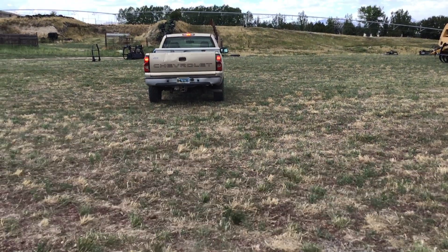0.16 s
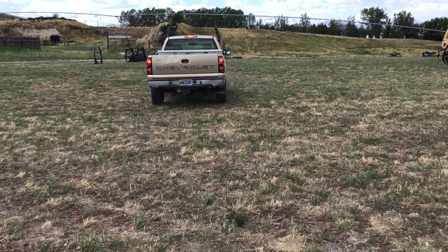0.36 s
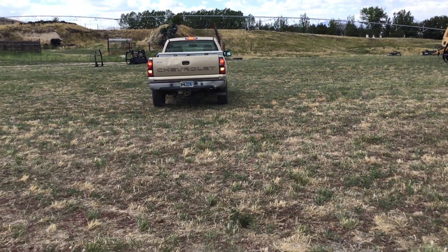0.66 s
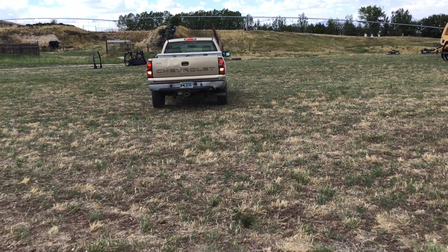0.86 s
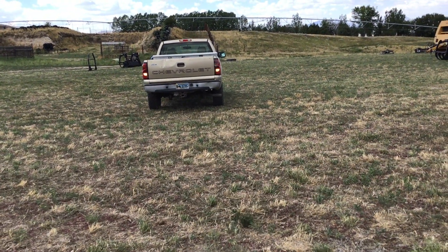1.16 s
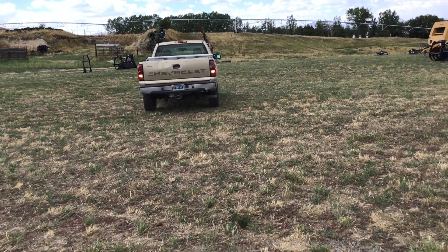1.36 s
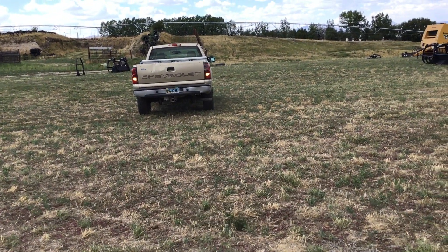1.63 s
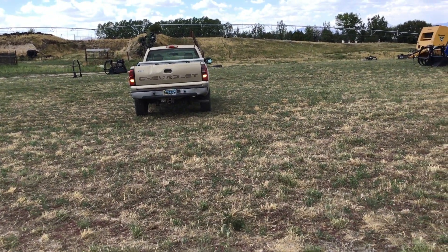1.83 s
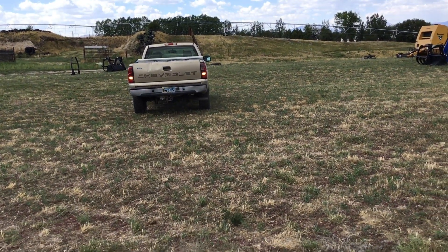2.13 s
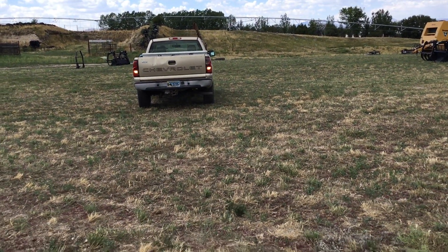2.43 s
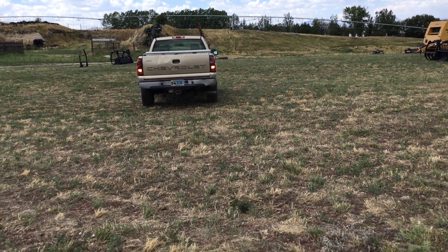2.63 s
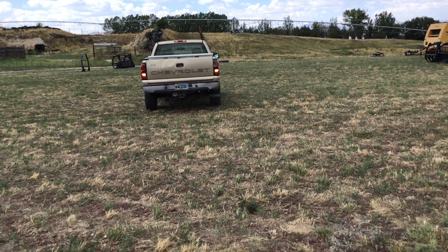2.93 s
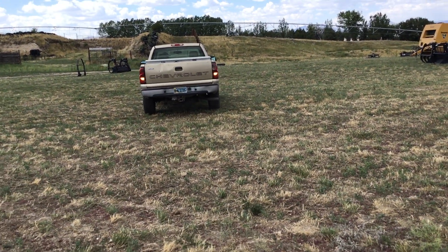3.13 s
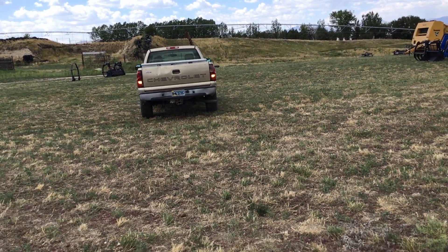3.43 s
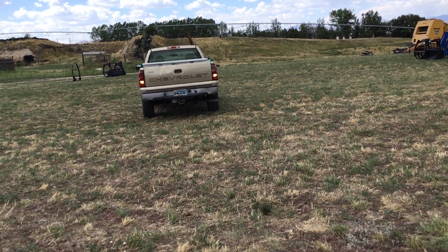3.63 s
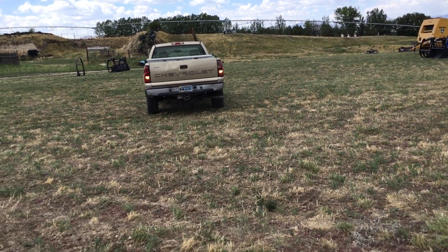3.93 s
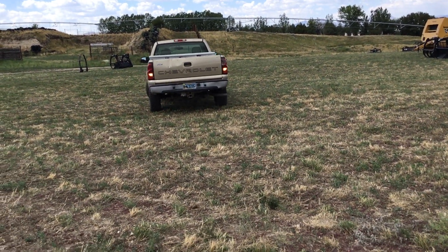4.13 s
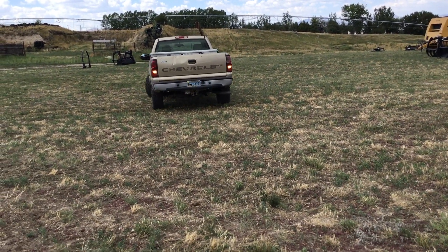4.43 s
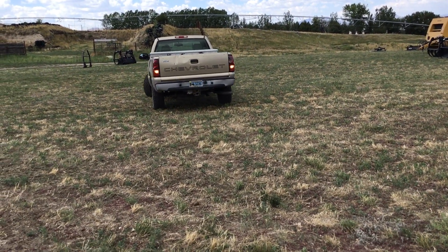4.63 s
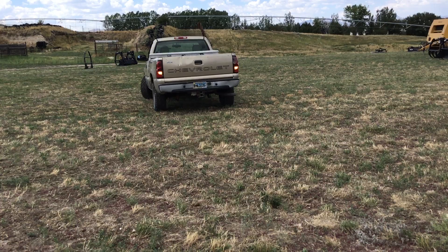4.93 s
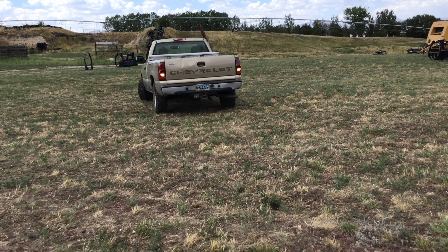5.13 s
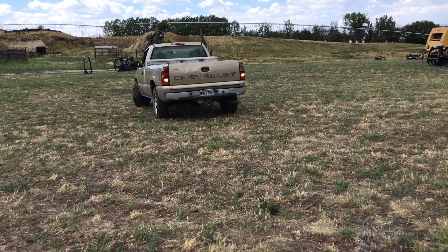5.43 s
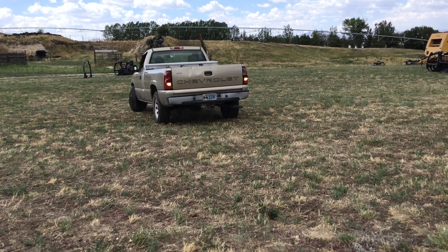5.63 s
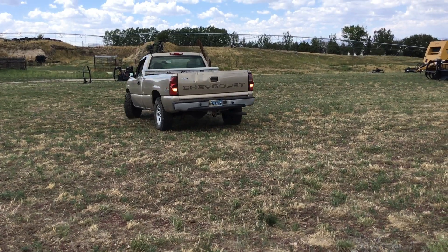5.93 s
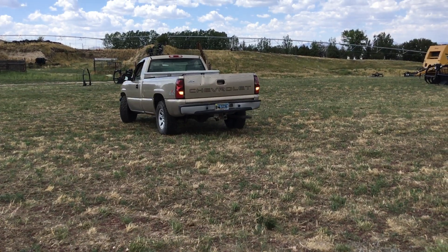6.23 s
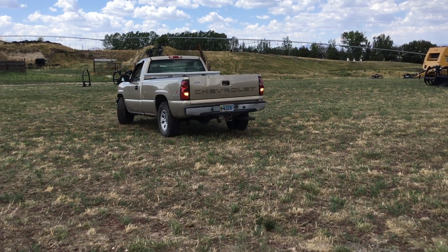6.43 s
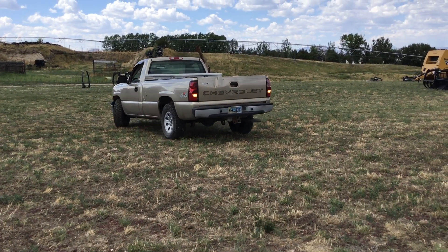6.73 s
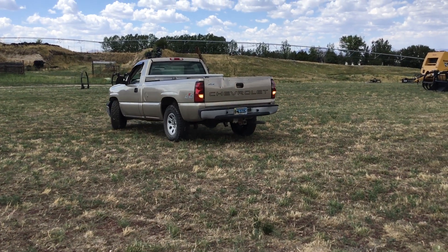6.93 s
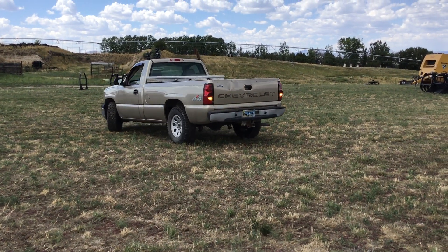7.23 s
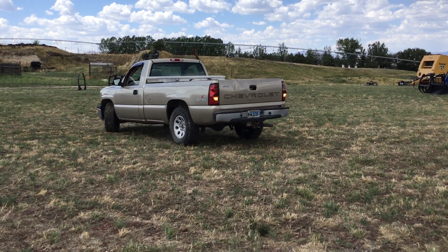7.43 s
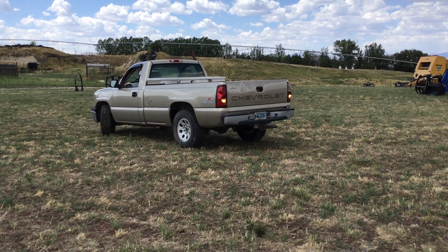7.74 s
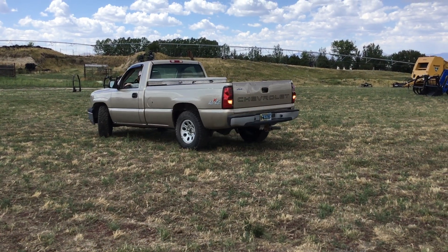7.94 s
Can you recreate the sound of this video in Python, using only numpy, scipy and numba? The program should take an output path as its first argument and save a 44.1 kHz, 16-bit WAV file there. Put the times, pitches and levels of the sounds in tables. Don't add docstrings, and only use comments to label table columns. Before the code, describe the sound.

A hand-held phone in an open field hears a truck reversing slowly toward it. Its throbbing exhaust rises and falls with the throttle over a faint distant engine hum and light breeze rumble. Metallic ticking and whirring strengthen as it nears. Close handling knocks, dull scuffs and grassy rustles interrupt, especially around three and 5.6 seconds; it ends on a rising rev with crackling straw.

```python
import sys
import numpy as np
from scipy import signal
from scipy.fft import rfft, irfft
from scipy.io import wavfile
from scipy.ndimage import uniform_filter1d
from numba import njit

SR = 44100
rng = np.random.default_rng(int(sys.argv[2]) if len(sys.argv) > 2 else 0)


def put_to_file(sound):
    columns = np.atleast_2d(sound).T
    safe = np.clip(columns, -1, 1)
    whole_steps = np.round(safe * 32767)
    wavfile.write(sys.argv[1], SR, whole_steps.astype(np.int16))


def level_to_linear(level):
    exponent = np.asarray(level, float) / 20
    return 10 ** exponent


N = 356019

# time_s, firing_rate_hz
ENGINE_SPEED = [(0.5, 43), (0.94, 47.9), (1.35, 46.8), (1.74, 38.4), (2.07, 47.2), (2.5, 50.6), (3.2, 46.2),
                (3.5, 49), (4.07, 74.3), (4.52, 62.6), (5.03, 68.9), (5.42, 63.6), (6.0, 52.9),
                (6.35, 56.6), (6.8, 63.8), (7.06, 43.6), (7.55, 52.5), (8.07, 72.5)]
# time_s, gain_db
THROTTLE_LOAD = [(0, -2.5), (1.1, -0.5), (2.7, -0.5), (3.2, -11.5), (3.7, -2.5), (4.2, 1.5), (5.5, 2.5),
                 (5.9, -0.5), (6.25, 4.5), (6.85, 2), (7.1, 1), (7.45, -1.5), (7.75, 5), (8.07, 1)]
# firing_rate_hz, order_1_db, order_2_db, order_3_db
EXHAUST_ORDERS = [(39, -86, -70, -55), (43.6, -80.5, -63, -58), (48, -70, -53, -54.5),
                  (49.7, -71.5, -54.5, -57.5), (55.1, -61.5, -51.5, -49), (62.5, -63, -49.5, -57.5),
                  (66, -66.5, -51, -78), (71, -54, -50, -68)]
# time_s, gain_db
CLOSENESS = [(0, -0.5), (.6, 1.5), (1.7, 0), (3.3, 0), (3.93, 6), (4.2, 4), (5.5, 6), (5.9, 8), (6.5, 11),
             (7.1, 7.5), (8.07, 11)]
# time_s, share_0_to_1
FLANK_TURN = [(0, 0.22), (5.4, 0.26), (6.2, 0.9), (8.07, 0.9)]
# pitch_hz, level_db (per Hz)
GROWL_COLOUR = [(60, -33), (90, -5), (140, 7), (190, 6.5), (225, 0), (260, -4.5), (300, 0), (330, -5.5),
                (355, -3.5), (390, -17), (450, -18), (520, -22), (700, -22), (1000, -64)]
# pitch_hz, width_hz, from_behind_db, from_flank_db
CASTINGS = [(1316, 17, 3.5, -5.5), (1510, 34, -17, -1.5), (1830, 26, 0.5, -5), (1978, 55, 12, -6.5),
            (2132, 60, -7, 1), (2262, 11, 6.5, -1.5), (2530, 61, 14.5, -26.5), (2610, 75, -5, -11),
            (2760, 17, -4.5, -4.5), (3310, 19, -16, -19), (3990, 45, -15, -18), (4800, 13, -16.5, -14.5)]
# pitch_hz, level_db (per Hz)
FAN_COLOUR = [(600, -22.5), (1200, -12), (1650, -4.5), (2300, -1.5), (2900, -2.5), (3200, -16),
              (5000, -19.5), (6500, -62)]
CYLINDER_KNOCK = [1, -1, 1, -1, -3, 4, 2, 2]
VALVE_TICK = [-5, 7, -5, 5, -2, -8, 6, -6]
# time_s, level_db
FAR_LEVEL = [(0, -57), (1.4, -59.5), (3.1, -63), (4, -55), (4.35, -56), (5.3, -71), (6, -59), (7, -59),
             (8.07, -56.5)]
# time_s, level_db
BREEZE_LEVEL = [(0, -68), (.6, -65.5), (2.4, -59), (3.5, -56.5), (4.1, -48.5), (4.35, -55), (4.9, -56),
                (5.25, -52.5), (5.8, -48.5), (6.2, -65), (6.5, -48), (7.0, -58), (7.5, -45.5),
                (8.07, -49.5)]
# pitch_hz, level_db (per Hz)
RUMBLE_COLOUR = [(20, -21), (40, -8.5), (60, 2.5), (80, -3), (105, 2), (150, 0.5), (300, -57.5)]
# pitch_hz, level_db (per Hz)
HISS_COLOUR = [(240, -16.5), (400, 8), (1290, -15.5), (1630, -10.5), (1820, -7.5), (2550, -8), (3070, -29),
               (4880, -14), (7630, -23), (14400, -54), (16000, -65)]
# full_at_s, rise_s, hold_s, level_db
BRUSH_STROKES = [(0.068, 0.025, 0.041, -78.5), (1.66, 0.052, 0.064, -79.5), (1.812, .03, .03, -82.5),
                 (2.605, .04, 0.13, -78.5), (2.85, 0.015, .02, -79), (2.92, .02, 0.041, -80.5),
                 (3.498, .12, 0.13, -75.5), (4.914, .04, .08, -94), (5.35, 0.074, .05, -78.5),
                 (5.454, .05, 0.11, -87), (5.77, 0.14, 0.046, -81.5), (5.99, 0.27, 0.12, -85),
                 (6.198, .05, 0.15, -86), (6.65, 0.028, 0.15, -81), (6.926, 0.054, 0.12, -84.5),
                 (7.13, .03, 0.13, -84.5), (7.62, .06, .06, -80), (7.766, 0.18, 0.083, -72),
                 (7.9, .05, .2, -71.5)]
# pitch_hz, level_db (per Hz)
STRAW_COLOUR = [(2500, -19), (3200, 4), (4000, 5.5), (5000, 3.5), (6000, -4), (7300, -21), (8200, -18),
                (9500, -74)]
# start_s, end_s, from_hz, to_hz, level_db
PUMP_WHINES = [
    (.13, .33, 4100, 3930, -84),
    (.42, 0.604, 1130, 1200, -81),
    (.4, .8, 4900, 4820, -87),
    (3.881, 4.03, 1125, 1174, -78),
    (7.86, 8.068, 985, 1047, -70.5),
]
# start_s, peak_db, pitch_hz, ring_s, swell_s
CASE_BUMPS = [(0.226, -37, 77.6, 0.065, 0.014), (2.978, -26.5, 97.4, 0.12, 0.0027),
              (3.007, -26.5, 80.5, 0.031, 0.0024), (3.396, -29.5, 72, 0.05, 0.0064),
              (3.629, -33.5, 72, 0.11, 0.0071), (3.956, -26, 108, 0.03, 0.0069),
              (4.314, -38, 70, 0.1, 0.0016), (5.606, -35.5, 80, 0.16, 0.0022),
              (5.645, -12.5, 87.5, 0.05, 0.0095), (5.761, -35.5, 84, 0.12, 0.015),
              (5.865, -35, 78, 0.15, 0.013), (7.343, -31.5, 65.5, 0.13, 0.021),
              (7.596, -33, 65, 0.09, 0.014), (7.737, -41.5, 86.5, 0.15, 0.0086)]
# pitch_hz, level_db
CASE_TONES = [(215, 0), (300, -3), (365, -6), (450, -11), (620, -19)]
# start_s, peak_db, centre_hz
CASE_SCUFFS = [(1.914, -56.5, 1080), (2.118, -49, 549), (2.445, -45.5, 549), (2.551, -49, 603),
               (2.598, -53, 565), (2.625, -49.5, 630), (2.68, -42.5, 780), (2.699, -48, 501),
               (2.93, -40, 536), (2.936, -46, 1030), (2.953, -48, 622), (2.965, -49, 501),
               (3.349, -57, 853), (3.579, -50, 611), (3.619, -52.5, 724), (5.65, -52, 520),
               (7.719, -52, 810), (7.934, -72, 1010)]
# start_s, peak_db, centre_hz, ring_s
CASE_DRAGS = [
    (2.606, -50, 327, 0.19),
    (2.632, -46.5, 292, 0.31),
    (2.682, -49, 494, 0.067),
    (2.85, -61, 3600, 0.12),
    (5.79, -54, 446, .05),
]
# start_s, peak_db, mid_band_db
BRIGHT_SNAPS = [(2.0167, -67, -75), (2.1283, -65, -74), (2.4428, -73, -76), (2.597, -61, -68),
                (2.8963, -66, -66), (2.9277, -58, -55.5), (2.681, -66, -69), (3.351, -77, -75),
                (3.879, -61, -72), (4.3116, -56, -78), (4.9107, -64, -79), (5.2091, -69, -77),
                (5.374, -50.5, -76), (5.5047, -55, -86), (5.977, -53, -75), (6.013, -56, -66),
                (6.048, -56, -68), (6.6917, -66, -74), (6.871, -51, -76), (6.944, -57, -78),
                (7.013, -57, -73), (7.0805, -59, -83), (7.7875, -51, -59), (7.8013, -51, -82),
                (7.9348, -40.5, -56.5), (7.954, -52, -67), (8.0127, -51, -63)]
TOP_BAND = [8000, 15800]


def level(x, db):
    return x * level_to_linear(db) / np.sqrt(np.mean(x ** 2))


def columns(table):
    s, *rest = np.transpose(table)
    return [np.interp(np.arange(N) / SR, s, column) for column in rest]


@njit
def band_pass(x, hz, width):
    y, band, low = np.empty(len(x)), 0., 0.
    g, damping = np.tan(np.pi * hz / SR), width / hz
    for i in range(len(x)):
        v = (band + g * (x[i] - low)) / (1 + g * (g + damping))
        band = 2 * v - band
        low += 2 * g * v
        y[i] = damping * v
    return y


def hiss():
    return rng.standard_normal(N)


def walk(rate):
    k = int(SR / rate)
    steps = np.repeat(rng.standard_normal(N // k + 1), k)
    return 1.3 * uniform_filter1d(uniform_filter1d(steps, k), k)[:N]


def per_firing(firing):
    return rng.standard_normal(N // 100)[firing]


def coloured(spectrum, x):
    hz, db = np.transpose(spectrum)
    log_hz = np.log(np.fft.rfftfreq(N, 1 / SR) + 1)
    return irfft(rfft(x) * level_to_linear(np.interp(log_hz, np.log(hz), db)), N)


def top_octave(x):
    return signal.sosfilt(signal.butter(8, TOP_BAND, "bandpass", fs=SR, output="sos"), x)


def add(out, s, sound):
    i = int(s * SR)
    out[i:i + len(sound)] += sound[:N - i]


def exhaust_note(hz, turns):
    rate_hz, *by_order = np.transpose(EXHAUST_ORDERS)
    load_db = columns(THROTTLE_LOAD)[0]
    note = np.zeros(N)
    for order, table_db in enumerate(by_order, 1):
        high_tone_cut_db = 0.15 * np.maximum(order * hz - 185, 0)
        db = np.interp(hz, rate_hz, table_db) + load_db - 0.5 + walk(12) - high_tone_cut_db
        note += np.sqrt(2) * level_to_linear(db) * np.cos(2 * np.pi * order * turns)
    return note


def exhaust_growl(firing, strength, puff):
    fired = np.diff(firing, prepend=0)
    return level(coloured(GROWL_COLOUR, 10.3 * fired * strength + (0.44 + puff) * hiss()), 7.46)


def cylinder_knocks(firing, since_firing):
    burst = np.exp(-since_firing / 0.36) * hiss()
    return burst * level_to_linear(np.array(CYLINDER_KNOCK)[firing % 8] + per_firing(firing))


def clatter(knock, firing, hz, width, cylinder_db):
    db = cylinder_db * rng.standard_normal(8)[firing % 8] + 1.5 * per_firing(firing) + 1.2 * walk(6)
    return level(band_pass(level_to_linear(db) * knock, hz, width), 0)


def engine_bay(knock, firing, puff):
    turn = columns(FLANK_TURN)[0]
    castings = np.zeros(N)
    for hz, width, back_db, flank_db in CASTINGS:
        ring = clatter(knock, firing, 1.0 * hz, 1.6 * width, 1.2)
        castings += level_to_linear(back_db + turn * (flank_db - back_db)) * ring
    fan = (1 + 0.5 * puff) * coloured(FAN_COLOUR, hiss())
    return level(castings, -0.9) + level(fan, -7.5)


def valve_ticks(knock, firing):
    ticks = (clatter(knock, firing, 8400., 800., 1.) + clatter(knock, firing, 9300., 800., 1.)
             + 0.3 * clatter(knock, firing, 12500., 6000., 1.))
    return level(top_octave(level_to_linear(np.array(VALVE_TICK))[firing % 8] * ticks), -2.5)


def truck(closer_db, duck):
    lag = int(0.09 * SR)
    hz = uniform_filter1d(uniform_filter1d(columns(ENGINE_SPEED)[0], lag), lag)
    turns = np.cumsum(hz * (1 + 0.002 * walk(25))) / SR
    growl_db = -65 + 0.65 * closer_db
    bay_db = -79 + 1.43 * closer_db + 0.0346 * (hz - hz.mean())
    tick_db = -92 + 1.3 * closer_db + 0.25 * (np.minimum(hz, hz.mean()) - hz.mean())
    firing = turns.astype(int)
    strength = level_to_linear(1.36 * per_firing(firing))
    puff = strength * np.exp(-(turns % 1))
    exhaust = exhaust_note(hz, turns) + level_to_linear(growl_db) * exhaust_growl(firing, strength, puff)
    knock_turns = turns + 0.45
    knocking = knock_turns.astype(int)
    knock = cylinder_knocks(knocking, knock_turns % 1)
    bay = level_to_linear(bay_db) * engine_bay(knock, knocking, puff)
    return duck * exhaust + bay + level_to_linear(tick_db) * valve_ticks(knock, knocking)


def far_engine():
    turns = np.cumsum(168.2 * (1 + 0.00911 * walk(12))) / SR
    throb = 1 + 0.6 * np.cos(2 * np.pi * (turns / 32 - 0.55))
    strength = np.sqrt(2) * level_to_linear(columns(FAR_LEVEL)[0] + 0.72 * walk(6))
    return strength * throb * np.sin(2 * np.pi * turns)


def air(duck):
    gusts_db = columns(BREEZE_LEVEL)[0] + 2.6 * walk(11)
    rumble = level_to_linear(gusts_db) * level(coloured(RUMBLE_COLOUR, hiss()), 0.5)
    return duck * rumble + level(coloured(HISS_COLOUR, hiss()), -78)


def brushing():
    t, fall_s = np.arange(N) / SR, 0.098
    depth_db = []
    for s, rise, hold, db in BRUSH_STROKES:
        times = [s - rise, s, s + hold, s + hold + fall_s]
        depth_db.append(db + np.interp(t, times, [-18, -1.5, 0, -27], -60, -60))
    return level_to_linear(np.max(depth_db, axis=0))


def rustle(closer_db):
    brush = brushing()
    top_gain = brush + level_to_linear(-93 + 0.46 * closer_db)
    rub_gain = level_to_linear(1) * brush + level_to_linear(-75.5 + 0.61 * closer_db)
    straw_gain = level_to_linear(-9.5) * brush + level_to_linear(-81 + 0.46 * closer_db)
    size = np.minimum(rng.exponential(size=N), 3.5)
    catches = (rng.random(N) < 0.003) * level_to_linear(4.3 * size)
    grains = 1 + 0.1 * signal.lfilter([1], [1, -0.96], catches)
    top = level(top_octave(grains * hiss()), 0.56)
    rub = level(band_pass(band_pass(grains * hiss(), 480., 700.), 720., 3000.), -1.86)
    straw_noise = hiss()
    stalks = np.zeros(N)
    for hz in (3500., 4050., 4850., 5500., 6600.):
        stalks += level_to_linear(2.5 * walk(4)) * band_pass(straw_noise, hz, 0.12 * hz)
    straw = level(coloured(STRAW_COLOUR, straw_noise + 1.3 * stalks), -1.27)
    return top_gain * level_to_linear(1.4 * walk(25)) * top + rub_gain * level_to_linear(0.68 * walk(30)) * rub + straw_gain * straw


def whines():
    out = np.zeros(N)
    for start, end, from_hz, to_hz, db in PUMP_WHINES:
        hz = np.linspace(from_hz, to_hz, int((end - start) * SR))
        fade = np.hanning(len(hz)) ** 0.17
        add(out, start, level_to_linear(db) * fade * np.sin(2 * np.pi * np.cumsum(hz) / SR))
    return out * level_to_linear(1.7 * walk(60))


def bumps():
    out, t = np.zeros(N), np.arange(SR // 4) / SR
    for s, db, hz, ring, swell in CASE_BUMPS:
        phase = 2 * np.pi * hz * (t + 0.0048 * (1 - np.exp(-t / 0.0096)))
        fade = np.exp(-np.log(1000) * (t / ring) ** 1.45)
        knock = np.zeros(len(t))
        for tone_hz, tone_db in CASE_TONES:
            knock += level_to_linear(tone_db) * np.sin(2 * np.pi * (tone_hz * t + rng.random()))
        sway = 0.25 * np.sin(0.615 * phase + 1.7)
        knock_gain = level_to_linear(1 + 0.61 * db)
        blow = np.sin(phase) + sway + knock_gain * fade * knock
        add(out, s, level_to_linear(db + 2.5) * np.tanh(t / swell) ** 1.7 * fade * blow)
    return out


def scuffs():
    out, t = np.zeros(N), np.arange(SR // 8) / SR
    short_ring_s = 0.032
    slips = [(*row, short_ring_s) for row in CASE_SCUFFS] + list(CASE_DRAGS)
    for s, db, hz, ring in slips:
        rubbed = band_pass(rng.standard_normal(len(t)), 1.0 * hz, 0.5 * hz)
        slip = level(band_pass(rubbed, 1.0 * hz, 7.5 * hz), db - 7.5)
        add(out, s, slip * np.exp(-np.log(1000) * t / ring))
    return out


def snaps():
    top, mid, t = np.zeros(N), np.zeros(N), np.arange(SR // 40) / SR
    for s, db, mid_db in BRIGHT_SNAPS:
        crack = level(rng.standard_normal(len(t)) * np.exp(-t / 0.0013), -15.5)
        add(top, s, level_to_linear(db - 0.5) * crack)
        add(mid, s, level_to_linear(mid_db + 10) * crack)
    return top_octave(top) + band_pass(band_pass(mid, 4200., 5700.), 4500., 6400.)


def scene():
    closer_db = columns(CLOSENESS)[0]
    blows = bumps()
    hold = np.exp(-1 / (0.12 * SR))
    recent_blow = signal.lfilter([1 - hold], [1, -hold], np.abs(blows))
    duck = 1 / (1 + (155 * recent_blow) ** 2)
    engines = truck(closer_db, duck) + duck * far_engine() + whines()
    return (engines + air(duck) + rustle(closer_db) + blows + scuffs() + snaps())[None]


def roll_off(x):
    return signal.sosfilt(signal.butter(12, 15830, fs=SR, output="sos"), x)


def record(dry):
    cut = signal.butter(6, 35, "highpass", fs=SR, output="sos")
    return roll_off(signal.sosfilt(cut, dry))


dry = scene()
out = record(dry)
put_to_file(out)
```